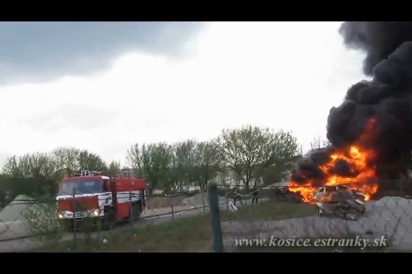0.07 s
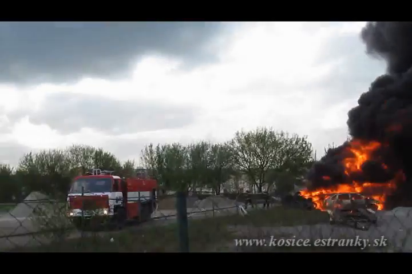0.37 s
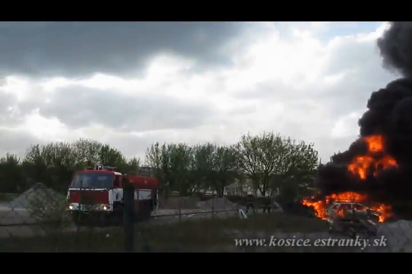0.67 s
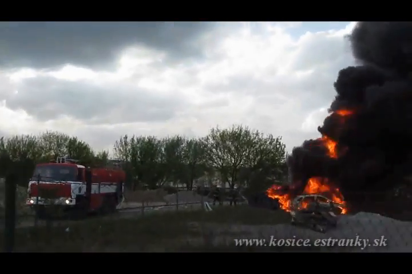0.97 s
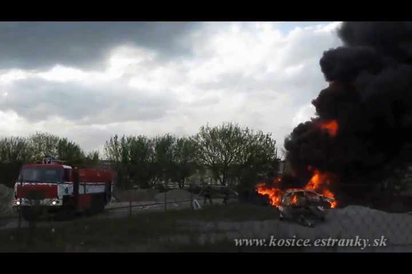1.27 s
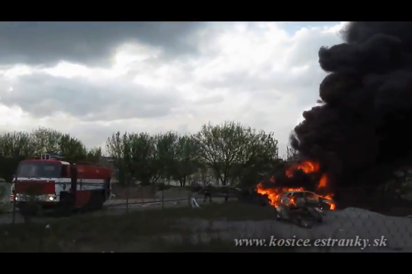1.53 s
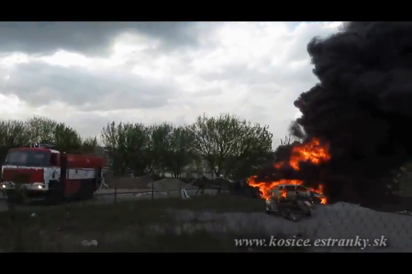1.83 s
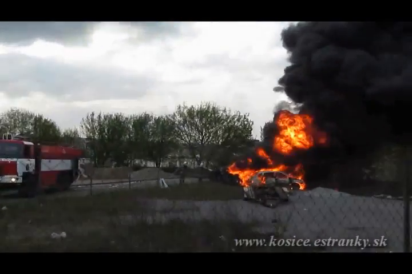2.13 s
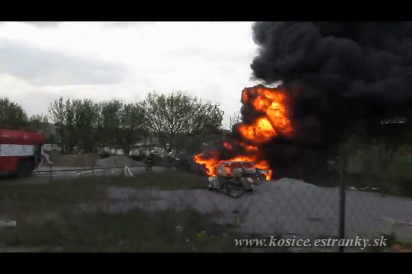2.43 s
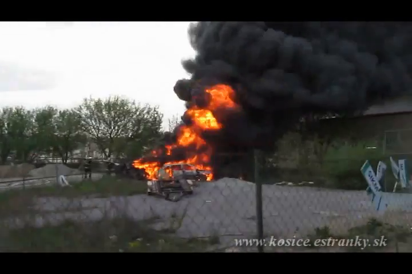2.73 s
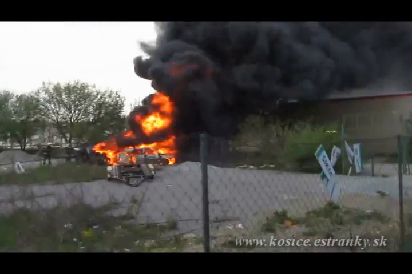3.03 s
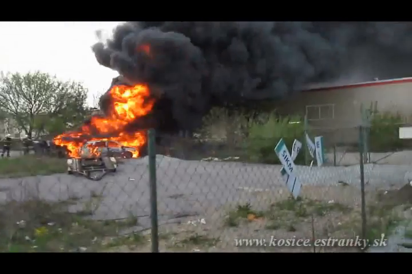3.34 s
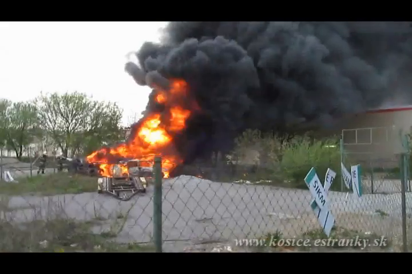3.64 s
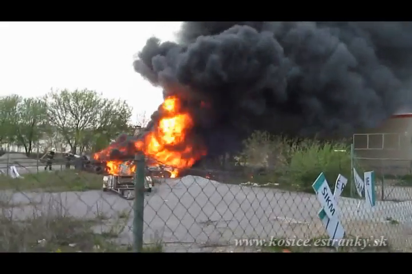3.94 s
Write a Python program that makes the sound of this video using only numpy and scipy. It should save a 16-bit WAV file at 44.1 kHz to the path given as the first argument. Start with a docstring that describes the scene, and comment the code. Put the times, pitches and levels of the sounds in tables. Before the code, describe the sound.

A large vehicle fire roars, rumbles and hisses outdoors throughout, with fine crackle, scattered ticks and brief sizzles. Loud, sharp pops come between 1.6 and 2.2 seconds, and again near 3 seconds. A fire truck's diesel drones some way off, speeding up from about 2.4 to 3.1 seconds. The roar swells and widens, deepening after 2.6 seconds and reaching its strongest at 4 seconds.

```python
"""A vehicle burns in an open yard: its turbulent flames roar, rumble and hiss as broadband noise.
Bursting pockets send out pressure pulses (pops, ticks, crackle), and jets of hot gas sizzle briefly.
Some way off, a fire engine's diesel drones in harmonics of its firing cycle and speeds up.
The roar swells as a fireball rises, and the stereo image widens as the camera turns to it;
the camera's gain control ducks after the loudest pops."""
import sys
import numpy as np
from scipy import signal
from scipy.fft import rfft, irfft, next_fast_len
from scipy.io import wavfile
from scipy.ndimage import uniform_filter1d, map_coordinates

SR = 44100
rng = np.random.default_rng(int(sys.argv[2]) if len(sys.argv) > 2 else 0)


def persist_wave(psi):
    """Save psi, clipped to +-1, as 16-bit WAV."""
    counts = np.round(np.clip(psi, -1, 1) * 32767).astype(np.int16)
    wavfile.write(sys.argv[1], SR, np.atleast_2d(counts).T)


N = 176400
TOP_HZ = 11600  # upper band limit


def amp(db):
    """Amplitude ratio of a level in decibels."""
    return 10 ** (np.asarray(db) / 20)


def unit(x):
    """Normalisation to rms 1."""
    return x / np.sqrt(np.mean(x ** 2) + 1e-20)


def along(points, hz):
    """Interpolation of (frequency, value) points on a logarithmic frequency axis."""
    freqs, values = np.transpose(points)
    return np.interp(np.log(hz + 1), np.log(freqs + 1), values)


def wobble(rate):
    """Random modulation: a smooth curve through `rate` Gaussian knots a second."""
    knots = rng.standard_normal(int(N * rate / SR) + 4)
    return map_coordinates(knots, [np.arange(N) * rate / SR])


def filtered(x, response):
    """Linear filtering: the spectrum of x times a frequency response."""
    size = next_fast_len(N + SR // 2)
    return irfft(rfft(x, size) * response(np.fft.rfftfreq(size, 1 / SR)), size)[..., :N]


def add(track, start, sound):
    """Superposition of a sound on a track from `start` seconds on."""
    part = track[round(start * SR):][:len(sound)]
    part += sound[:len(part)]


def turbulence(spectrum, patchy_db):
    """Turbulent flow radiates noise, its gain varying in patches of time and frequency; rms 1."""
    cells = signal.stft(rng.standard_normal(N), nperseg=512)[2]
    patches = uniform_filter1d(rng.standard_normal(cells.shape), size=7, axis=0)
    patches = uniform_filter1d(patches, size=10, axis=1)
    noise = signal.istft(cells * amp(patchy_db * unit(patches)), nperseg=512)[1][:N]
    return unit(filtered(noise, lambda hz: amp(along(spectrum, hz))))


def snap(tilt_db, ring_hz=4000, ring_width_hz=390, size=1024):
    """A bursting pocket radiates a minimum-phase pulse with a damped resonance; peak 1."""
    # pulse spectrum (frequency [Hz], relative level [dB])
    spectrum = [(200, -51), (1000, -23), (1900, -9), (2600, -10), (3300, -2), (5300, -0.5), (6100, -6),
                (7300, -5), (11500, -13.5)]
    hz = np.fft.rfftfreq(size, 1 / SR)
    rolloff_db = np.clip((TOP_HZ - hz) / 100, -40, 0)
    ring_db = 3 / (1 + ((hz - ring_hz) / ring_width_hz) ** 2)
    octaves = np.log2(hz / 3300 + .11)
    cepstrum = irfft(np.log(amp(along(spectrum, hz) + tilt_db * octaves + ring_db + rolloff_db)))
    cepstrum[1:size // 2] *= 2  # folding onto positive time makes the pulse causal
    cepstrum[size // 2 + 1:] = 0
    pulse = irfft(np.exp(rfft(cepstrum)))
    return pulse / np.abs(pulse).max()


def diesel(roar_db, jitter_cycles=.0016, size=16384):
    """Source and filter: harmonics of the firing cycle glide through the truck's fixed resonances."""
    # engine speed (time [s], full firing cycles [1/s])
    speed = [(0, 10.56), (2.3, 10.63), (2.5, 10.9), (2.7, 11.52), (2.9, 11.93), (3.1, 12.15), (4, 12.35)]
    # prominent harmonics (order [multiple of the cycle rate])
    strong_orders = [6, 12, 20, 22, 24, 31, 44, 51, 57, 73, 79]
    # their emphasis (gain [dB])
    strong_db = [2.3, 3.4, 5.3, 8.3, 6.8, 10, 8.7, 8.2, 9.1, 10.7, 8.8]
    # resonances of the truck (frequency [Hz], gain [dB])
    body = [(45, -51), (64, -46), (85, -46), (107, -36), (130, -35.5), (145, -45), (190, -43), (222, -53),
            (246, -43.5), (270, -43.5), (320, -55.5), (400, -48.5), (550, -49), (650, -51), (840, -49),
            (2100, -58.5), (3500, -83)]
    cycles = np.cumsum(np.interp(np.arange(N) / SR, *np.transpose(speed))) / SR
    cycles += jitter_cycles * wobble(18)  # uneven running
    orders = np.arange(size // 2 + 1)
    order_db = 2.5 * rng.standard_normal(len(orders)) * (orders > 12)
    order_db[strong_orders] = strong_db
    phasors = np.exp(2j * np.pi * rng.random(len(orders)))
    one_cycle = irfft(amp(order_db) * (orders < 330) * phasors) * size / np.sqrt(2)
    excitation = np.interp(cycles, np.arange(size) / size, one_cycle, period=1)
    drone = filtered(excitation, lambda hz: amp(along(body, hz)))
    follow_db = .86 * (roar_db - roar_db.mean())  # louder as the whole yard grows louder
    return drone * amp(follow_db + 1.5 * wobble(6.79))


def crackle(snaps_per_s=140, spread_db=6, growth_db_per_s=4):
    """A Poisson process of faint snaps, random in size and sign, slowly growing louder."""
    sizes = amp(np.minimum(rng.standard_normal(N), 1.6) * spread_db) * rng.choice([-1, 1], N)
    impulses = sizes * (rng.random(N) < snaps_per_s / SR)
    snaps = signal.fftconvolve(impulses, snap(tilt_db=3))[:N]
    return snaps * amp(7 + growth_db_per_s * (np.arange(N) - N / 2) / SR)


def ticks(tail_db=-11, t60_s=.025):
    """Scattering: each single snap trails a very short, exponentially decaying noise."""
    # ticks (time [s], peak level [dB], spectral tilt [dB/octave])
    events = [(.0528, -18, -2), (.168, -16.5, -1), (0.6765, -8.5, -10), (1.141, -8.5, -5),
              (1.1837, -14.5, 6), (2.0303, -13.5, -7), (2.475, -11, 4), (2.592, -12, 1), (2.6778, -8.5, -2),
              (3.324, -15, 0), (3.5135, -9, -4.5)]
    track, t = np.zeros(N), np.arange(SR // 20) / SR
    for start, peak_db, tilt_db in events:
        pulse = snap(tilt_db)
        scatter = unit(signal.fftconvolve(rng.standard_normal(len(t)), pulse)[:len(t)])
        add(track, start, amp(peak_db) * pulse)
        add(track, start, scatter * amp(peak_db + tail_db - 60 * t / t60_s))
    return track


def spurts(rise_s=.008, t60_s=.27):
    """Jet noise: each spurt of hot gas rises quickly, holds and decays exponentially."""
    # spurts (time [s], hold [s], level [dB])
    events = [(0.415, 0.02, -28), (0.592, 0.05, -28.5), (1.292, 0.038, -30.5), (1.436, .07, -32),
              (2.577, 0.014, -29), (2.85, 0.0059, -27.5), (2.932, 0.07, -29)]
    # jet spectrum (frequency [Hz], relative level [dB])
    spectrum = [(600, -51), (2000, 4.5), (3500, 3), (5000, 4.5), (6500, -7), (11500, -16.5)]
    t = np.arange(N) / SR
    envelope = np.zeros(N)
    for start, hold, level_db in events:
        decay_db = 60 * np.maximum(t - start - hold, 0) / t60_s
        envelope += np.clip((t - start) / rise_s, 0, 1) * amp(level_db - decay_db)
    sizzle = turbulence(spectrum, patchy_db=1.5) * amp(4.4 * wobble(400))
    return envelope * unit(sizzle)


def pops(gap_s=.0045, repeat_loss_db=8, fry_rise_s=.0052, fry_t60_s=.071):
    """Pulse train: a lead snap, a second, usually louder one with three fading repeats, a frying tail."""
    # pops (time [s], lead snap level [dB], second snap level [dB], tail level [dB],
    #       spectral tilt [dB/octave], ring frequency [Hz])
    events = [(1.6068, -3.5, 5.5, -13.5, -5.5, 3280), (1.652, -6, -16, -20.5, -5, 5570),
              (1.7610, -2.5, -1, -15.5, -1, 4400), (1.8825, -24, 3.5, -12.5, 0, 4440),
              (2.1782, -1.5, 2.5, -15, -7, 3430), (2.9520, -4, -6, -17.5, -0.5, 6700),
              (2.968, -10, -6, -16.5, -5, 3770)]
    track, t = np.zeros(N), np.arange(SR // 5) / SR
    fade = amp(-60 * t / fry_t60_s) * (1 - np.exp(-t / fry_rise_s))
    for start, lead_db, second_db, tail_db, tilt_db, ring_hz in events:
        pulse = snap(tilt_db, ring_hz)
        grains = rng.standard_normal(len(t)) * amp(1.5 * wobble(706)[:len(t)])
        fry = unit(signal.fftconvolve(grains, pulse)[:len(t)])
        add(track, start, amp(lead_db) * pulse)
        for k in range(4):
            delay = (k + 1) * gap_s * (1 + .015 * rng.standard_normal())
            add(track, start + delay, amp(second_db - k * repeat_loss_db) * pulse)
        add(track, start, amp(tail_db) * fry * fade / fade.max())
    return track


def flames(roar_db, rumble_db, hiss_db):
    """Turbulent combustion radiates three flickering noise bands: roar, deep rumble and hiss."""
    # spectra of the three bands (frequency [Hz], relative level [dB])
    roar_spectrum = [(90, -12), (200, -0.5), (350, -2.5), (560, 0.5), (950, 0.9), (1150, -3), (1500, -2),
                     (2600, -13), (5000, -20), (11000, -31.5)]
    rumble_spectrum = [(12, -28), (28, 0), (50, 7), (70, 12), (120, 9), (165, 1.5), (230, -7), (450, -37)]
    hiss_spectrum = [(500, -23), (1500, 7.5), (2500, 9.5), (5000, -2), (6500, -5), (9500, -10.5),
                     (11500, -38)]
    roar = turbulence(roar_spectrum, patchy_db=1.04) * amp(roar_db + .71 * wobble(24.86))
    rumble = turbulence(rumble_spectrum, patchy_db=.3) * amp(rumble_db + 1.1 * wobble(29.9))
    hiss = turbulence(hiss_spectrum, patchy_db=1.6) * amp(hiss_db + .68 * wobble(25) + 1.37 * wobble(300))
    return roar + rumble + hiss


def scene(widen_db_per_s=3, lean_db=1.5, lean_hz=3000):
    """Mid-side stereo: the fire is ahead; its scattered, uncorrelated sound widens the image."""
    # course of the blaze (time [s], roar level [dB], rumble level [dB], hiss level [dB])
    blaze = [(0, -34.5, -34, -33.5), (.35, -32.5, -35, -35.5), (.7, -30, -34, -34.5),
             (1.1, -28.5, -33, -31.5), (1.45, -27, -28.5, -32), (1.75, -24.5, -30, -28.5),
             (2.1, -27.5, -30.5, -30.5), (2.42, -26, -30, -32.5), (2.65, -24, -24, -32),
             (2.86, -23, -25, -40), (3.05, -21, -27, -33.5), (3.35, -20.5, -27.5, -35.5),
             (3.72, -19, -24, -35), (4, -17, -19, -35)]
    # response of the side channel to scattered sound (frequency [Hz], gain [dB])
    width = [(400, -42), (700, -24), (1500, -12), (2400, -6.5), (3800, -4.5), (4100, -34)]
    t = np.arange(N) / SR
    times, *levels = np.transpose(blaze)
    roar_db, rumble_db, hiss_db = [np.interp(t, times, level) for level in levels]
    mid = flames(roar_db, rumble_db, hiss_db) + diesel(roar_db)
    mid += pops() + ticks() + spurts() + amp(hiss_db) * crackle()
    scattered = flames(roar_db, rumble_db, hiss_db) + .5 * spurts()
    scattered *= amp(widen_db_per_s * (t - t.mean()))  # the camera turns
    side = filtered(scattered, lambda hz: amp(along(width, hz)))
    lean = amp(lean_db / 2) - 1  # the band around lean_hz lies a little to the right
    side -= filtered(mid, lambda hz: lean * np.exp(-((hz - lean_hz) / (lean_hz / 2)) ** 4))
    return np.array([mid + side, mid - side])


def record(dry):
    """Automatic gain control (fast attack, slow release), then clipping, two notches and a low-pass."""
    limit_db, release_db_per_s, full_scale = -1, 7, .9
    notches_hz, notch_width_hz = (5900, 7840), 107
    over_db = np.maximum(20 * np.log10(np.abs(dry.mean(0)) + 1e-9) - limit_db, 0)
    release_db = release_db_per_s * np.arange(N) / SR
    duck_db = np.maximum.accumulate(over_db + release_db) - release_db
    duck_db = signal.lfilter([.03], [1, -.97], duck_db)  # smooths the attack
    clipped = np.clip(dry * amp(-duck_db), -full_scale, full_scale)

    def response(hz):
        """Filters in cascade multiply: Gaussian notches and a steep band limit."""
        notches = [1 - .8 * np.exp(-((hz - centre) / notch_width_hz) ** 2) for centre in notches_hz]
        return np.prod(notches, axis=0) / np.sqrt(1 + (hz / TOP_HZ) ** 180)

    return filtered(clipped, response)


dry = scene()
out = record(dry)
persist_wave(out)
```